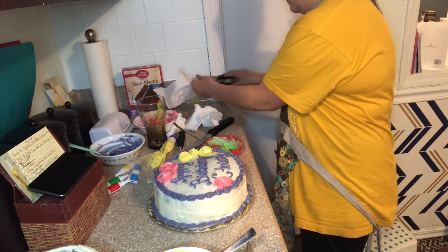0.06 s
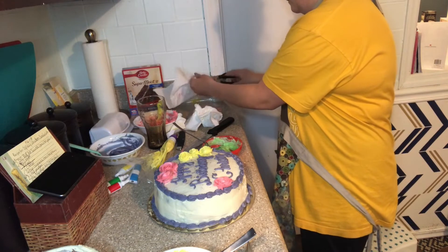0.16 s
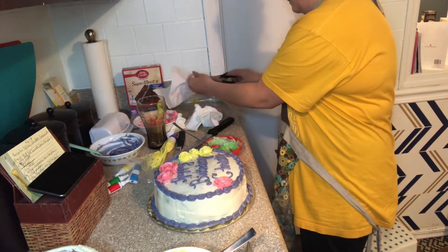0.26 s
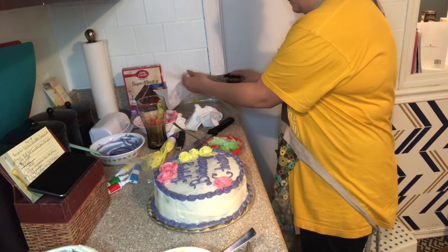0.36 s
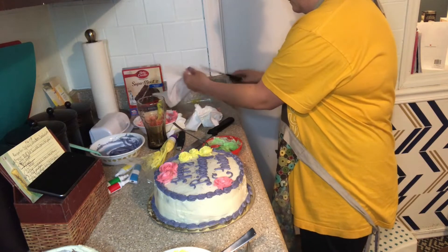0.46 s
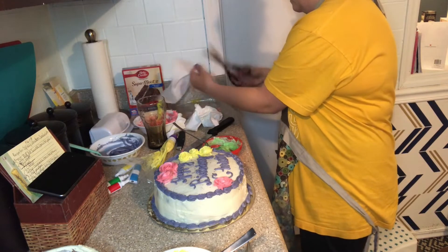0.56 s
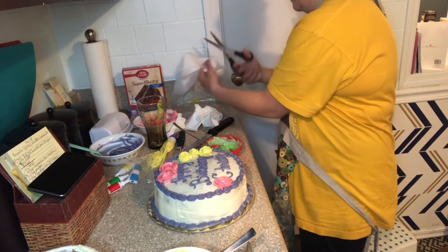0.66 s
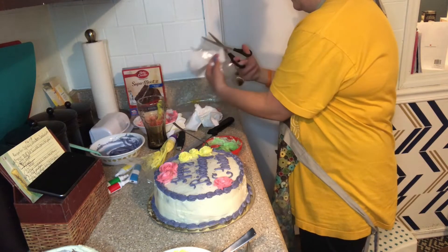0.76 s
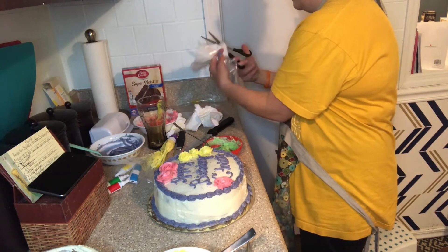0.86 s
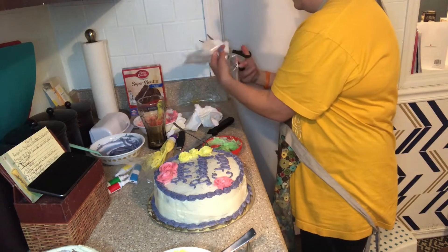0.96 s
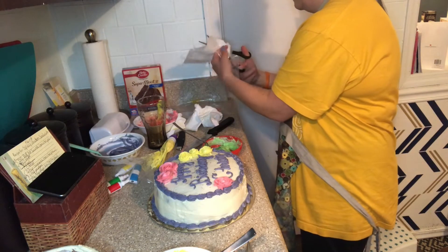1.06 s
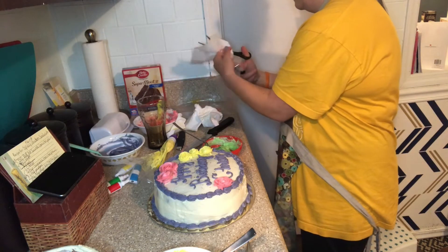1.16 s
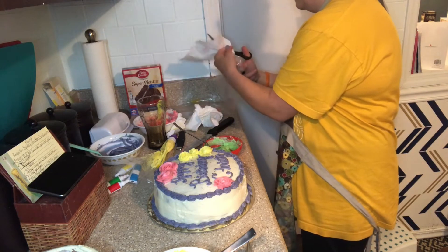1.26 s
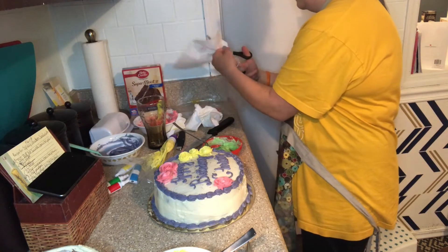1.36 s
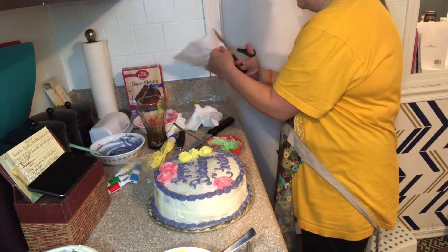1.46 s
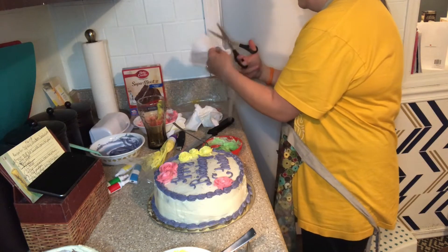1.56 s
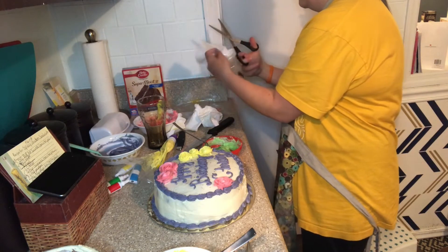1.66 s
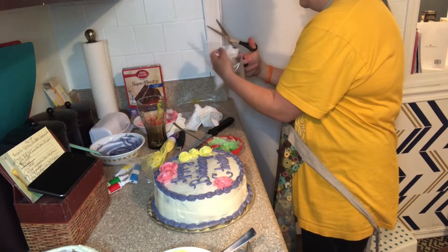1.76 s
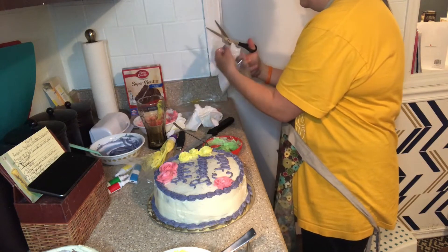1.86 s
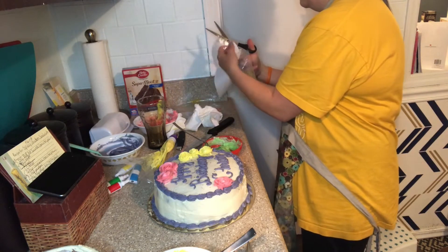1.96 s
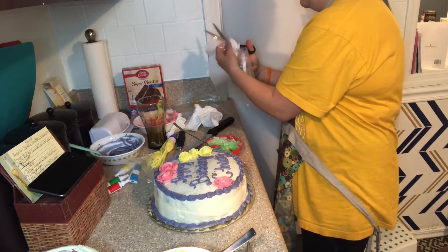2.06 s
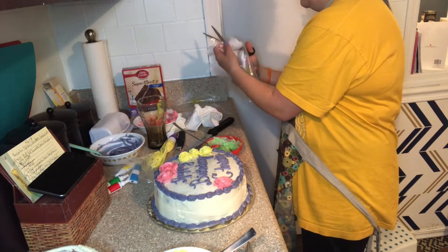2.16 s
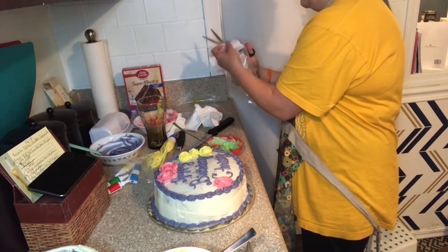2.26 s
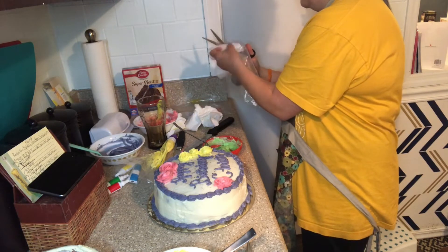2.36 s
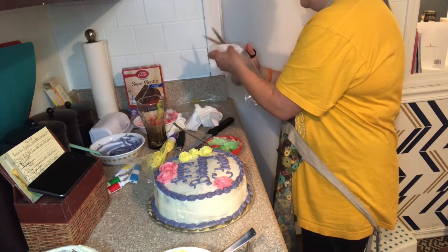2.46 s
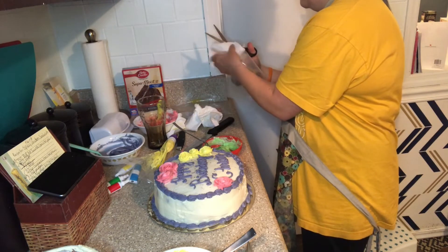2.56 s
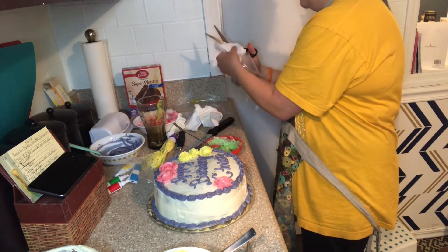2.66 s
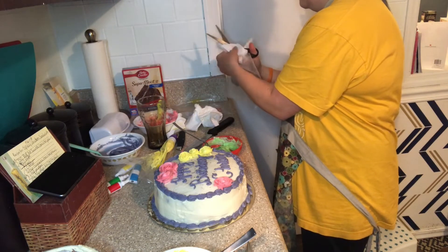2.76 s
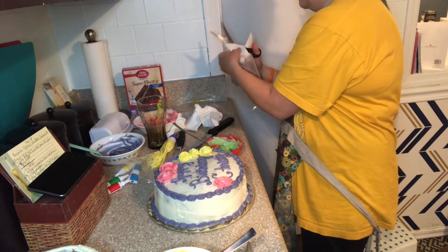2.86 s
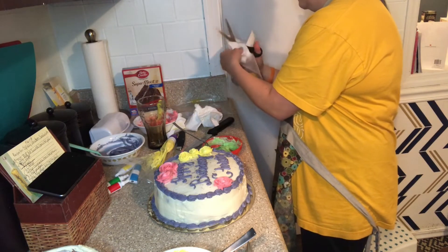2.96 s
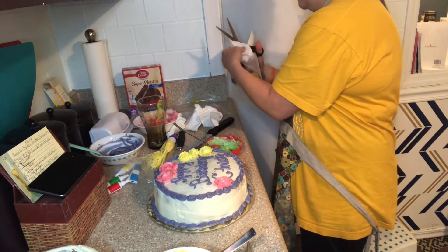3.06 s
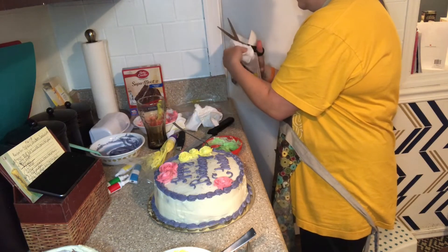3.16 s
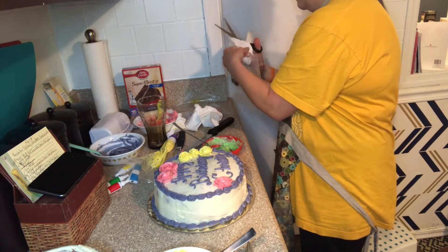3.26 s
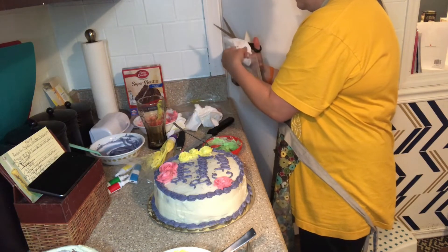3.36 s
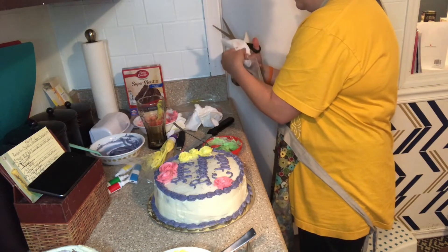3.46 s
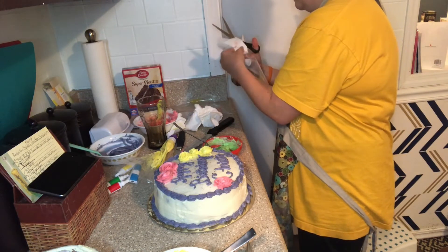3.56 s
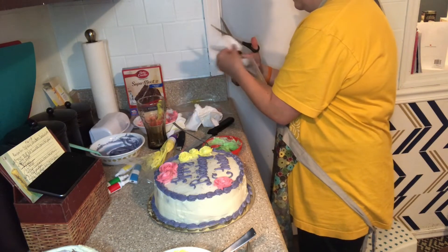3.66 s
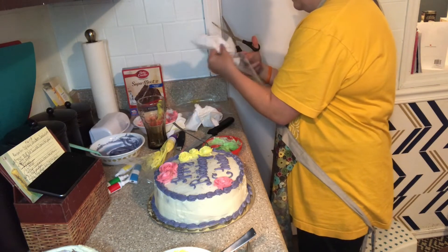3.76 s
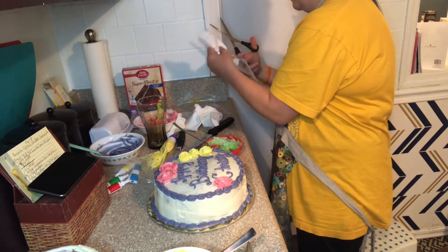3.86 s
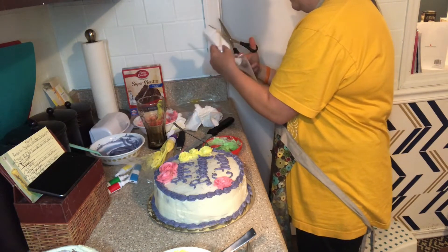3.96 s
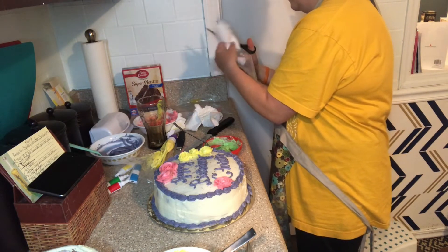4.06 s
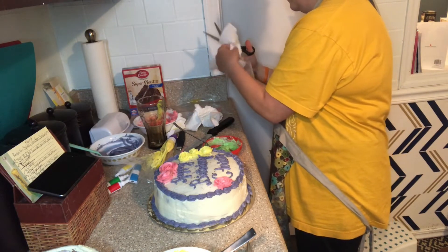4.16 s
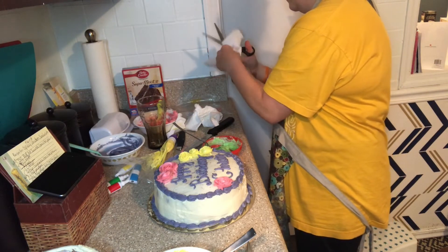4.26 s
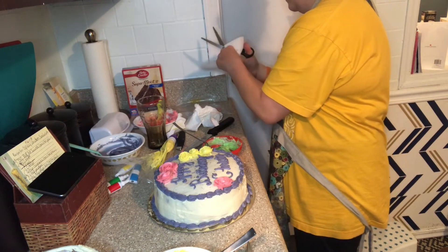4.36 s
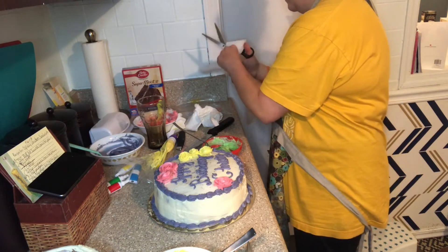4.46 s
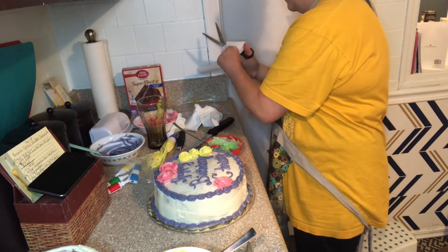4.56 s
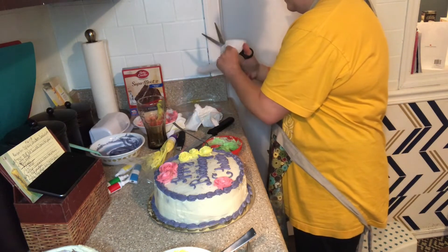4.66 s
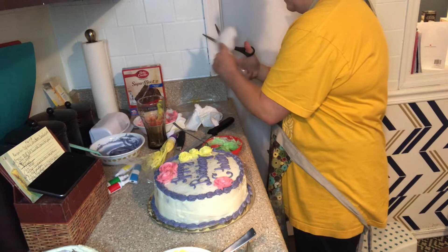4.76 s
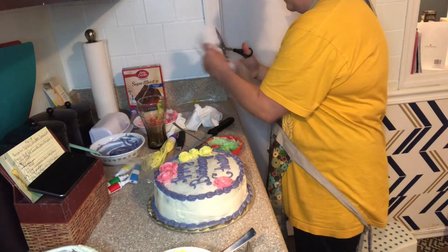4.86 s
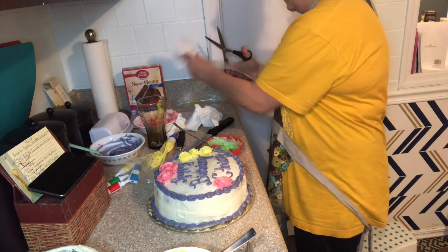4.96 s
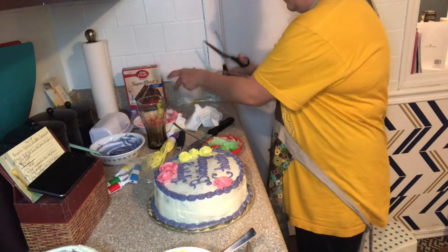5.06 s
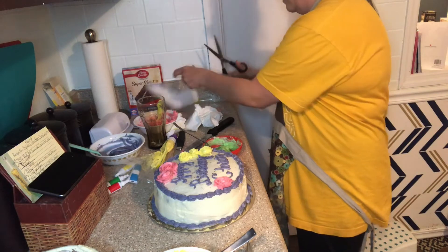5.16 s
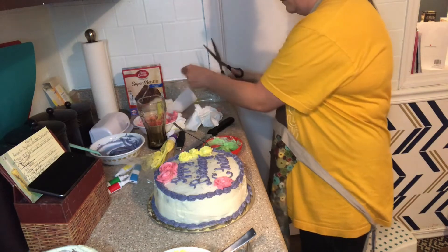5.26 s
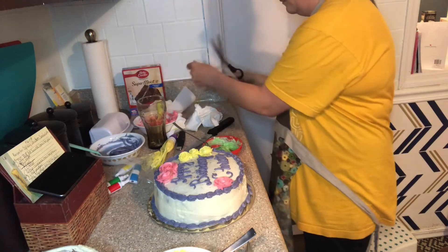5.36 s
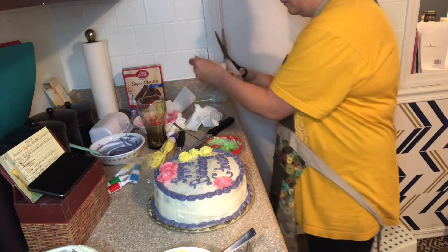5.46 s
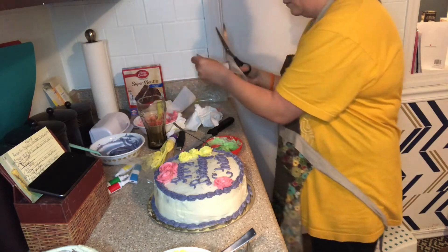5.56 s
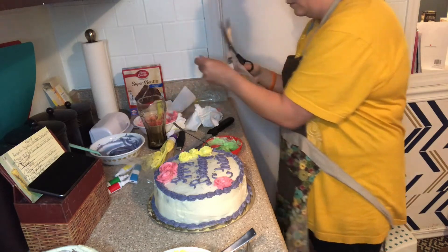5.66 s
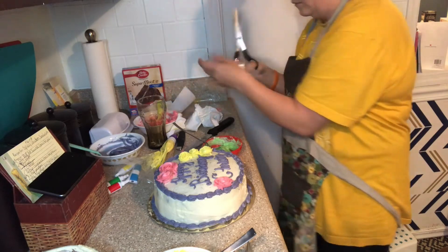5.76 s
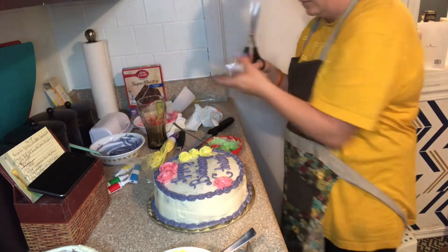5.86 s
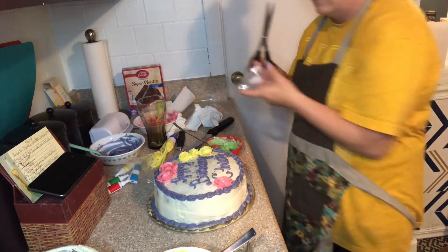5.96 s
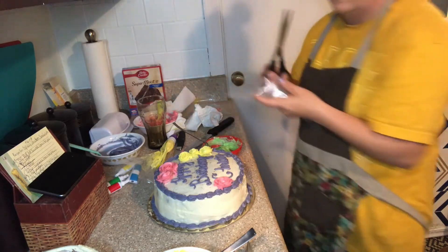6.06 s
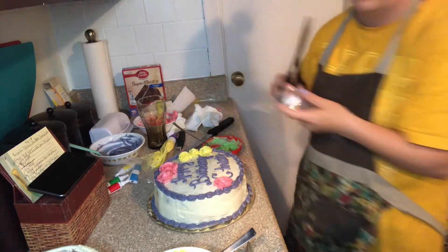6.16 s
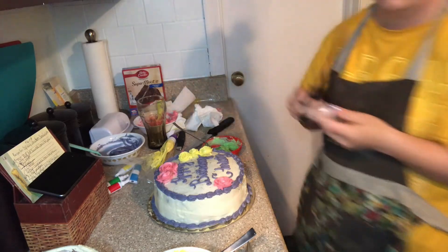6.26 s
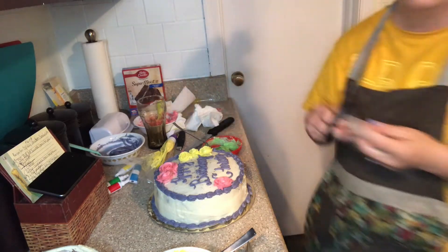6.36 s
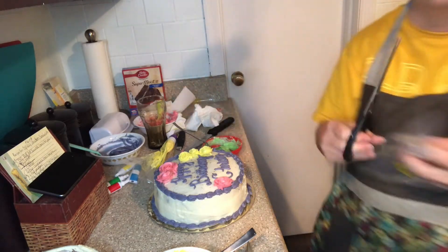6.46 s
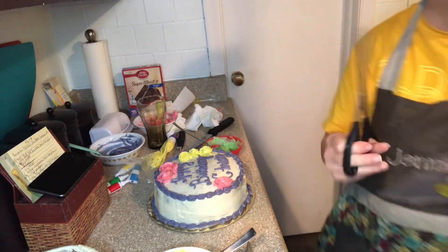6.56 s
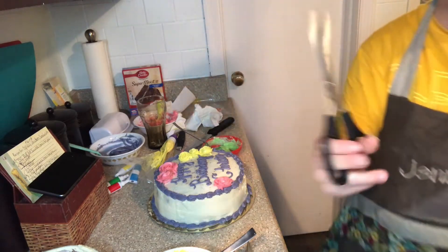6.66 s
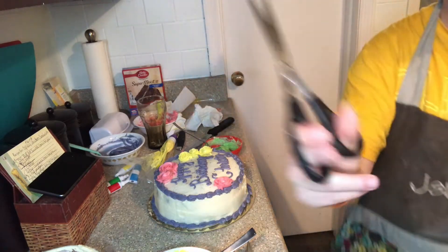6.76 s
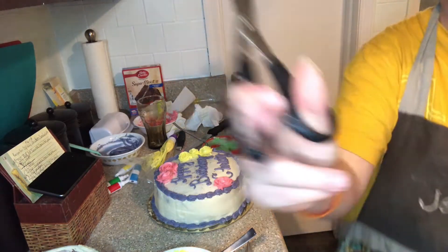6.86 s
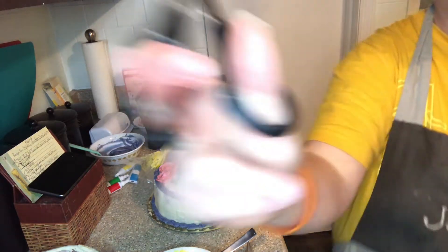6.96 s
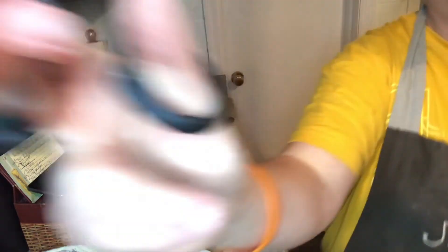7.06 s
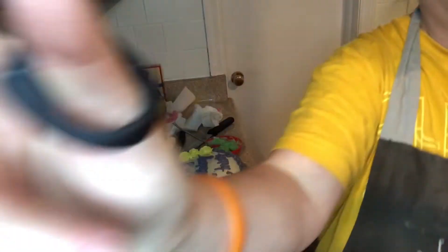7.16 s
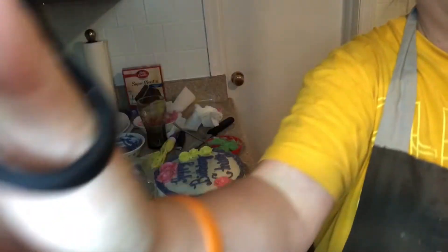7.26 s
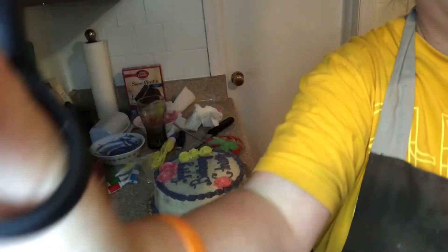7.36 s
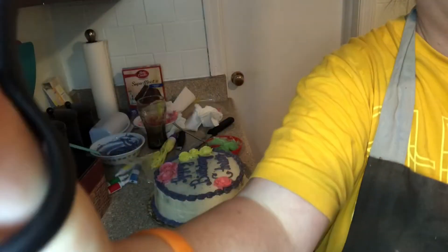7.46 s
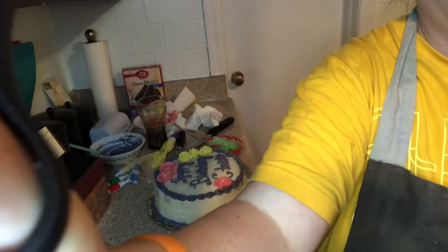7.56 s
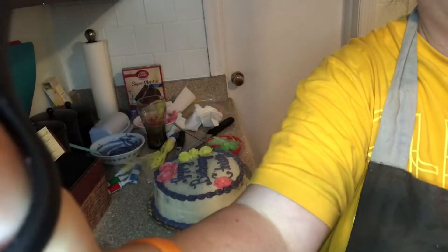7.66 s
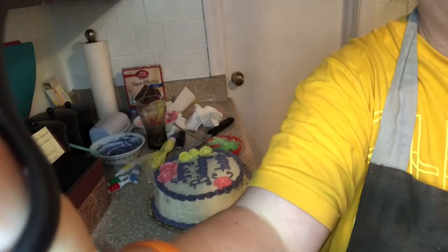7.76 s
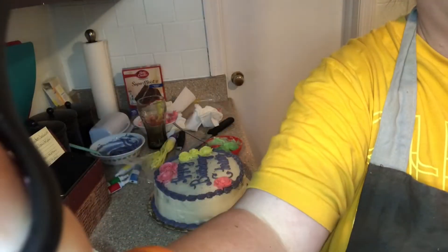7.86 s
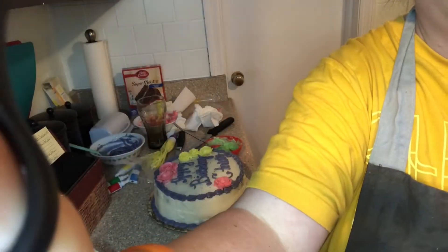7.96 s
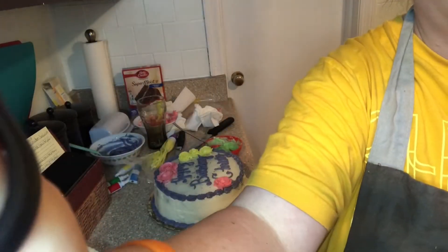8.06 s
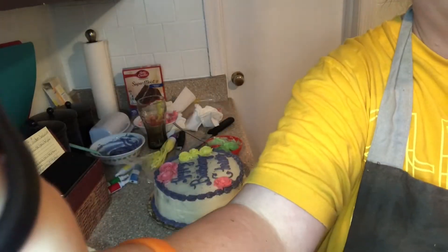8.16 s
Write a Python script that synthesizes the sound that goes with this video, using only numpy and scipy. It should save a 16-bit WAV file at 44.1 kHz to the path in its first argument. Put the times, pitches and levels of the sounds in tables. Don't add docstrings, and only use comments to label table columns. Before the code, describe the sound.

A thin plastic bag crinkles and snaps in a hard kitchen over faint hum, then blunt finger taps knock the microphone at the end.

```python
import sys
import numpy as np
from scipy import signal
from scipy.fft import rfft, irfft, next_fast_len
from scipy.io import wavfile

SR = 44100
rng = np.random.default_rng(int(sys.argv[2]) if len(sys.argv) > 2 else 0)


def generate_wav(signal):
    frames = np.transpose(np.atleast_2d(signal))
    scaled = np.clip(frames, -1, 1) * 32767
    pcm = np.round(scaled).astype(np.int16)
    wavfile.write(sys.argv[1], SR, pcm)


def invert_db(x):
    u = np.asarray(x, float) / 20
    return 10 ** u


N = 362061


def rms_one(x):
    return x / np.sqrt(np.mean(x ** 2) + 1e-20)


def in_time(rows):
    s, *columns = np.transpose(rows)
    return [np.interp(np.arange(N) / SR, s, c) for c in columns]


def at_hz(points, hz):
    table_hz, values = np.transpose(points)
    return np.interp(np.log(hz), np.log(table_hz), values)


def drift(rate_hz):
    r = np.exp(-80 * np.pi * rate_hz / SR)
    white = rng.standard_normal(N // 40 + 2002)
    slow = signal.lfilter([1], [1, -2 * r, r * r], white)[2000:]
    return np.interp(np.arange(N) / 40, np.arange(len(slow)), rms_one(slow))


def colour(x, spectrum):
    size = next_fast_len(N)
    hz = np.arange(size // 2 + 1) * SR / size + 1
    low_fall = np.minimum(hz / spectrum[0][0], 1) ** 3
    gain = invert_db(at_hz(spectrum, hz)) * low_fall
    return rms_one(irfft(rfft(x, size) * gain, size)[:N])


def resonate(x, hz, width_hz):
    r = np.exp(-np.pi * width_hz / SR)
    poles = [1, -2 * r * np.cos(2 * np.pi * hz / SR), r * r]
    return signal.lfilter([(1 - r * r) / 2, 0, (r * r - 1) / 2], poles, x)


def band_pass(x, order, low_hz, high_hz):
    return signal.sosfilt(signal.butter(order, [low_hz, high_hz], "band", fs=SR, output="sos"), x)


def swells(s, db, rise_s, fade_s):
    late_s = np.arange(0, N + 64, 64)[:, None] / SR - s
    below = np.maximum(-late_s / np.abs(rise_s), late_s / np.abs(fade_s))
    power = np.sum(invert_db(2 * (db - 20 * below)), axis=1)
    return np.interp(np.arange(N) / 64, np.arange(len(power)), 10 * np.log10(power + 1e-20))


# start_s, level_db
BACKGROUND = [(0.0, -68), (0.4, -68), (1.5, -67), (2.0, -67), (2.06, -60), (3.3, -61), (4.4, -61),
              (5.5, -62), (6.25, -61), (6.5, -60), (6.75, -62.5), (7.33, -57.5), (7.5, -61), (7.63, -67),
              (7.85, -66.5), (8.08, -66.5), (8.15, -71)]
# pitch_hz, level_db (per Hz)
RUMBLE = [(40, -19), (55, -2), (80, -12.5), (100, -2), (160, -10), (260, -11.5), (500, -27.5), (900, -44.5)]
HISS = [(180, -32), (300, -5.5), (372, -41.5), (418, -6), (1400, -23.5), (6670, -27), (8410, -30),
        (15800, -37.5)]
# peak_s, level_db, half_length_s
LUMPS = [
    (1.7, -74.5, .1),
    (2.5, -69, .3),
    (3.5, -65.5, 0.2807),
    (5.3, -52, 0.441),
    (6.37, -43, 0.073),
    (6.556, -58, 0.435),
    (7.305, -51, 0.33),
    (7.851, -54, 0.1277),
    (8.175, -44.5, 0.0544),
]


def background():
    hum_hz, lump_floor_db, hiss_db = 121.6, -76.5, -73
    level_db, = in_time(BACKGROUND)
    rumble = invert_db(1.6 * drift(6)) * colour(rng.standard_normal(N), RUMBLE)
    steady = np.sqrt(2) * np.sin(2 * np.pi * hum_hz * np.arange(N) / SR)
    wobble = rms_one(resonate(rng.standard_normal(N), hum_hz, 31))
    hum = invert_db(0.5) * (0.65 * steady + 0.5 * wobble)
    s, db, half_s = np.transpose(LUMPS)
    lumps = np.hypot(invert_db(swells(s, db, half_s, half_s)), invert_db(lump_floor_db))
    deep = invert_db(-10.5) * lumps * rms_one(resonate(rng.standard_normal(N), 74, 32))
    hiss = invert_db(hiss_db) * colour(rng.standard_normal(N), HISS)
    return invert_db(level_db) * (rumble + hum) + deep + hiss


# start_s, level_db, brightness_db
HANDLING = [(0.0, -72.5, 0), (0.2, -66, 6), (0.55, -67.5, -12), (0.76, -84, 0), (1.75, -64, -3.5),
            (2.03, -59, -1), (2.1, -59, -6), (2.6, -59, -0.5), (3.0, -72.5, 2), (3.35, -59.5, -16),
            (3.5, -70.5, -5), (3.8, -63.5, -1.5), (4.6, -57, -4.5), (5.1, -64, 2), (5.4, -78, 2.5),
            (6.3, -67, -1), (6.7, -78, -2), (7.35, -75, -18)]
# peak_s, level_db, swell_s, fade_s (both over 20 dB), brightness_db
UNFOLD = [
    (0.32, -60.5, 0.14, 0.03947, 14),
    (0.85, -54.5, 0.08518, 0.02, 7),
    (1.023, -53, 0.099, 0.14, -2.5),
    (1.17, -52, .02, 0.056, -1),
    (1.23, -55, 0.044, 0.03154, -14),
    (1.4, -52, 0.12, 0.1657, 1),
    (1.61, -59, 0.13, 0.126, 5),
    (1.89, -69, 0.01844, 0.1329, 16),
]
WORK = [(2.08, -56.5, 0.0644, 0.2116, -0.5), (2.19, -53.5, 0.098, 0.1058, 5.5),
        (2.33, -60.5, 0.03113, 0.52, 7), (2.46, -54, 0.042, 0.13, 11), (2.67, -56.5, 0.1669, 0.038, -2),
        (2.76, -67, .05, 0.02854, 16), (2.89, -56.5, 0.2029, 0.0522, 1), (2.99, -54, 0.0328, 0.032, -4),
        (3.1, -54, 0.1207, 0.13015, -4), (3.27, -59, 0.13, 0.112, 9), (3.63, -57.5, 0.12, 0.17, 6),
        (3.7, -57.5, 0.14, 0.0607, 4), (3.9, -55.5, 0.13, 0.03634, -23), (3.97, -61, .02, 0.22, -10),
        (4.199, -52.5, 0.01908, 0.24, 3.5), (4.31, -60.5, 0.1515, 0.024, 7),
        (4.37, -61, 0.02546, 0.02886, 13), (4.53, -55.5, 0.17, 0.12, 0.5), (4.63, -73, 0.0799, 0.28, -3),
        (4.783, -51, 0.027, 0.099, 12), (4.74, -57.5, .08, 0.23, 2), (4.89, -58, 0.028, 0.058, 8.5),
        (5.01, -53, 0.02425, 0.086, -4)]
TURN = [(5.6, -65.5, 0.2115, 0.1244, -10.5), (5.749, -60.5, 0.023, 0.13, 10), (5.898, -53, 0.051, 0.07, 3),
        (6.05, -52, 0.05335, 0.068, 3), (6.217, -49, 0.012, 0.022, 15), (6.265, -55.5, 0.02256, 0.18, -1),
        (6.165, -63.5, 0.0177, 0.029, 12), (6.35, -55, 0.19, 0.14, 0), (6.427, -47, 0.027, 0.047, 3),
        (6.85, -62, 0.07307, 0.03925, 4), (6.93, -58.5, 0.1, 0.1482, 6), (7.17, -61, 0.1788, 0.043, -6),
        (7.26, -59.5, 0.14, 0.063, 16)]
# pitch_hz, level_db (per Hz)
BAG_BODY = [(180, -3), (300, -1), (500, 6.5), (800, 2.5), (1200, -1.5), (2000, -49)]
CREASES = [(600, -18), (1100, -6.5), (1600, 1), (2200, -4.5), (3000, -5), (4500, -9.5), (7000, -31.5)]
FINE = [(2500, -14.5), (4200, -3), (6000, -1.5), (8000, -1), (9500, -14), (13000, -14.5)]
AIRY = [(6500, -16), (9000, 7), (11000, 8.5), (13500, -5), (16000, -1)]
# level_db (above a squeeze), brightness_share, stretch (of swell and fade, ratio)
PARTS = [
    (-3, -0.081, 1.31),
    (0, 0.12, 1.04),
    (-5, 0.9, 0.73),
    (-15.5, 0.66, 1.1313),
]


def crumpling(per_s, spread_db, clump_db):
    hands_still_s, stop_s = 7.4, 0.13
    born = rng.random(N) < per_s / SR
    size_db = spread_db * np.minimum(rng.exponential(1, N), 3.5)
    pops = born * invert_db(size_db) * rng.choice([-1, 1], N)
    stop_db = 20 * np.maximum(np.arange(N) / SR - hands_still_s, 0) / stop_s
    pops = pops * invert_db(clump_db * drift(52.76) - stop_db)
    s, db, swell_s, fade_s, bright_db = np.transpose(UNFOLD + WORK + TURN)
    steady_db, steady_bright_db = in_time(HANDLING)
    out = 0
    for (part_db, share, stretch), shape in zip(PARTS, (BAG_BODY, CREASES, FINE, AIRY)):
        squeezes_db = swells(s, db + share * bright_db, stretch * swell_s, stretch * fade_s)
        gain = np.hypot(invert_db(squeezes_db), invert_db(steady_db + share * steady_bright_db))
        out = out + invert_db(part_db) * gain * colour(pops, shape)
    return out


def panels(film, ring_db, sharpness, grip_s, count):
    size, out = round(grip_s * SR), np.zeros(N)
    starts = np.arange(0, N - 2 * size, size)
    for at, draws in zip(starts, rng.random((len(starts), count))):
        piece = film[at:at + 2 * size] * np.hanning(2 * size)
        for hz in 280 * (7000 / 280) ** draws:
            out[at:at + 2 * size] += resonate(piece, hz, hz / sharpness)
    return invert_db(ring_db) * out


# pitch_hz, t60_s
KITCHEN = [(300, 0.06145), (1000, 0.3), (2500, 0.47), (6000, 0.36), (14000, 0.2233)]


def kitchen(x, first_wall_s, patchy_db):
    edges = 250 * 2 ** np.arange(0, 6.4, 1 / 3)
    echo, white = 0, rng.standard_normal((2, N))
    for k, (low, high) in enumerate(zip(edges, edges[1:])):
        keep = invert_db(-120 / SR / at_hz(KITCHEN, np.sqrt(low * high)))
        energy = signal.lfilter([1 - keep], [1, -keep], band_pass(x, 2, low, high) ** 2)
        patches = invert_db(patchy_db * drift(4.9))
        echo = echo + np.sqrt(energy) * patches * rms_one(band_pass(white[k % 2], 2, low, high))
    return np.roll(echo, round(first_wall_s * SR))


def noise_filter(x):
    opens_s, focus_hz, focus_width_hz, focus_db = 2.05, 2150, 1000, 0.5
    closed = np.clip((opens_s - np.arange(N) / SR) / 0.01, 0, 1)
    focus = invert_db(focus_db) * resonate(x, focus_hz, focus_width_hz)
    dull = 0.5 * band_pass(x, 1, 450, 9000)
    return x + closed * (focus + dull - x)


# start_s, level_db, pitch_hz, fade_s (over 20 dB), sharpness (pitch over width, ratio)
FOLDS = [(0.06, -65, 2269, .15, 1.756), (0.19, -56.5, 2470, .3, 1.5), (0.25, -54.5, 1960, .2, 2.7),
         (0.31, -53, 2174, -0.2, 0.942), (0.461, -50, 2150, -0.25, 3.1), (0.845, -61, 440, -0.15, 3.06),
         (1.015, -53, 2270, -0.2, 2.2), (1.175, -56, 500, -0.5, 3.1), (1.184, -51, 1900, -0.5, 3.8),
         (1.39, -59.5, 405.8, -0.3, 2.5), (1.6, -48, 1210, 0.0193, 2), (1.8, -63, 420, 0.6793, 2.168),
         (1.89, -60.5, 454, .1, 2.7), (2.182, -50.5, 2850, 1.5, 5.9), (2.243, -51, 792, -0.1, 1.5),
         (2.487, -62, 900, -1, 1.022), (2.56, -54.5, 5030, .15, 2.854), (2.648, -53.5, 2150, 0, 2.3),
         (2.98, -57.5, 790.8, -0.2, 2.5), (4.1, -54, 230, -0.1, 3.005), (4.438, -54, 760, -0.2, 3.1),
         (4.46, -50, 521.7, -0.14, 3.6), (4.645, -58, 3427, -0.2, 1.855), (4.79, -51, 763, -0.3, 2.6),
         (4.81, -51.5, 2050, .08, 3.5), (5.02, -67, 1290, 0.2025, 2.26), (5.15, -64, 748.9, .16, 2.586),
         (5.53, -66.5, 774.7, 0.8, 3.34), (5.77, -63.5, 493.1, .16, 3.5), (5.76, -61, 3947, .2, 3),
         (5.79, -56.5, 2374, -0.4, 3.1), (5.88, -62, 1789, -0.5, 4.76), (6.045, -53, 402, 0, 4),
         (6.06, -73, 6296, 7.6881, 5.5), (6.26, -47, 1200, .025, 2.6), (6.321, -51, 902.3, 0, 1.1),
         (6.44, -52.5, 2600, -6, 2.8), (6.434, -52, 1140, 0.06, 1.8), (7.23, -53.5, 2811, 0.135, 2.2),
         (7.5, -67, 187, .16, 2.5)]


def folds():
    swell_share, shortest_s, longest_s = 0.15, 0.015, 0.3
    lead = SR // 8
    out, t = np.zeros(N + SR), np.arange(-lead, SR // 3) / SR
    grains = rng.standard_normal((len(FOLDS), len(t))) ** 3
    for (s, db, hz, fade_s, sharpness), noise in zip(FOLDS, grains):
        width_hz = hz / sharpness
        tone = rms_one(resonate(resonate(noise, hz, width_hz), hz, width_hz))
        drop_db = 20 * np.maximum(-t / swell_share, t) / np.clip(fade_s, shortest_s, longest_s)
        at = round(s * SR)
        out[at:at + len(t)] += tone * invert_db(db - drop_db)
    return out[lead:lead + N]


def snap_colour(x, hz, body_db, edge_db, octaves):
    usual_edge_db = -16.5
    top_db = -5 + edge_db + 0.32 * (edge_db - usual_edge_db)
    bands = [(hz / 2 ** octaves, hz * 2 ** octaves, 0),
             (1063, 4570, 2.7),
             (400, 1100, body_db + 6.5),
             (3800, 9000, edge_db + 6.5),
             (8000, 16000, top_db)]
    return sum(invert_db(db) / np.sqrt(high - low) * band_pass(x, 2, low, high) for low, high, db in bands)


# start_s, peak_db, pitch_hz, brightness_db, room_share_db
SNAPS = [(0.4468, -30.5, 1850, -7, -10.5), (0.84, -39, 2830, 11, -8), (0.9875, -30, 1920, -3, -18),
         (1.1275, -40, 1510, -12.5, -10), (1.1682, -29.5, 2150, 5.5, -14.5),
         (1.2572, -28.5, 3954, 14.5, -14), (1.6016, -35, 2230, 1, -20), (1.6528, -36.5, 1740, -7.5, -17),
         (1.8824, -35.5, 2900, -6, -22), (1.9125, -36, 1350, -7, -9), (2.168, -31, 2802, 12, -3.5),
         (2.2074, -35.5, 2000, 2, -15), (2.4558, -34.5, 1930, 21, -14), (2.6425, -41.5, 2000, -13.5, -3),
         (3.9617, -30.5, 3705, 8, -9.5), (4.1956, -33, 1620, -4, -19), (4.5263, -30, 1292, 21.5, -7),
         (4.779, -33, 2584, 16.5, -7), (5.0096, -35, 1298, 2, -6), (5.743, -35.5, 3647, -2, -5.5),
         (6.047, -34.5, 2795, 3, -5), (6.21, -33, 1770, -8, -9), (6.3225, -36, 1554, -15.5, -12),
         (6.4245, -28.5, 2286, -1, -7.5)]
# start_s, peak_db, pitch_hz, brightness_db
SMALL_SNAPS = [(0.65, -48.5, 3880, 16), (0.2891, -44, 2040, -0.5), (0.6918, -53, 1413, -2),
               (0.81, -48, 3350, -12), (0.9717, -40, 2600, -2), (1.236, -39, 3074, 0),
               (1.383, -46, 1547, -7), (1.522, -46, 1333, -5), (1.614, -43.5, 2200, -9),
               (1.8594, -50, 2316, -15), (2.1056, -42, 2360, 1), (2.3592, -41, 4444, 0),
               (2.554, -43.5, 5533, -6), (2.7452, -52, 1910, -3), (2.872, -45, 1350, 8),
               (2.9719, -37, 2680, -8), (3.0822, -41, 1330, -5), (3.248, -45.5, 1793, -2),
               (3.376, -49.5, 3600, 4), (4.209, -45.5, 4500, 3), (4.532, -40, 1300, -6),
               (4.9996, -47, 5500, 5), (3.881, -39, 3057, -11), (4.3628, -42, 3700, 8),
               (4.4338, -38.5, 799.2, 5), (4.6399, -38.5, 1840, -7), (4.892, -43, 2040, -0.5),
               (5.529, -50, 745, -20.5), (5.573, -54, 1490, 0), (5.875, -46, 1920, -4),
               (5.883, -48, 2504, 0), (5.988, -44.5, 1680, -8), (6.025, -48, 3500, -5),
               (6.0328, -38.5, 1740, -12), (6.2873, -41.5, 1920, -5), (6.895, -50, 5000, 4.5),
               (7.23, -45, 3000, 2), (6.2611, -40.5, 1207, -9), (7.215, -51, 2520, 4.5),
               (7.34, -47.5, 894, -17)]
# delay_s, level_db
EARLY = [
    (.0026, -3.5),
    (.0045, -9.5),
    (.0066, -8),
]


def snaps(crack_s, octaves):
    small_room_db = -9
    dry, wet, t = np.zeros(N + SR), np.zeros(N + SR), np.arange(SR // 30) / SR
    echoes = np.zeros(SR // 100)
    for delay_s, echo_db in [(0.0015, 0), *EARLY]:
        echoes[round(delay_s * SR)] = invert_db(echo_db)
    rows = [*SNAPS] + [(*row, small_room_db) for row in SMALL_SNAPS]
    for (s, db, hz, bright_db, room_db), noise in zip(rows, rng.standard_normal((len(rows), len(t)))):
        body_db = -15 - bright_db - 8 * np.log2(hz / 1500)
        edge_db = -16.5 + bright_db
        crackle = np.convolve(noise * np.exp(-t / crack_s), echoes)[:len(t)]
        pop = snap_colour(crackle, hz, body_db, edge_db, octaves)
        pop = invert_db(db) * pop / np.abs(pop).max()
        click = snap_colour(1. * (t == 0), hz, body_db, edge_db, octaves)
        at = round(s * SR)
        dry[at:at + len(t)] += pop
        wet[at:at + len(t)] += rms_one(click) * np.std(pop) * invert_db(room_db + 7.5)
    return dry[:N], wet[:N]


def brush():
    peak_s, level_db, rise_s, fade_s, ends_s = 7.48, -62.5, 0.02337, 0.079, 7.53
    hiss = colour(rng.standard_normal(N), [(5000, -24.5), (9000, -4), (13000, 2.5), (16000, -1.0)])
    return invert_db(swells(peak_s, level_db, rise_s, fade_s)) * (np.arange(N) < ends_s * SR) * hiss


# start_s, peak_db, first_pitch_hz, t60_s, sag_s
TAPS = [(7.8229, -23.5, 640, 0.013, 0.0086), (7.826, -36, 257, 0.0444, 0.0097),
        (7.874, -54.5, 756.3, .04, 0.03344), (7.8835, -46.5, 758.2, 0.01579, 0.02452),
        (7.8886, -35.5, 700, 0.017396, .008), (7.892, -43, 300, 0.026, 0.013),
        (8.1653, -15, 655, 0.011, 0.013), (8.169, -33, 250, 0.036, .01), (8.176, -40.5, 500, .05, .02),
        (8.1825, -27, 624.4, .03, .03), (8.189, -30, 1215, 0.014, 0.01137), (8.188, -11, 770, 0.033, 0.013),
        (8.1928, -24, 414, .04, 0.0093), (8.1979, -11, 1016, 0.019, .009), (8.203, -20, 617, 0.01935, 0.04)]
# start_s, peak_db, pitch_hz
TICKS = [
    (7.886, -59.5, 1946),
    (8.1642, -54, 2800),
    (8.1881, -40, 2600),
    (8.1915, -60, 4466),
    (8.198, -38.5, 4400),
]


def housing(touch_s):
    shell_skew = 0.15
    rattle_db, rattle_t60_s, tick_t60_s = -12.5, 0.06, 0.0072
    out, t = np.zeros(N + SR), np.arange(SR // 10) / SR
    for s, db, hz, t60_s, sag_s in TAPS:
        at = round(s * SR)
        phase = 2 * np.pi * hz * sag_s * (1 - np.exp(-t / sag_s))
        touch = (1 - np.exp(-t / touch_s)) ** 3
        shell = np.sin(phase) + shell_skew * np.cos(2 * phase)
        out[at:at + len(t)] += touch * invert_db(db + 3.5 - 60 * t / t60_s) * shell
    for (s, db, hz), noise in zip(TICKS, rng.standard_normal((len(TICKS), len(t)))):
        at = round(s * SR)
        tick = invert_db(db - 60 * t / tick_t60_s) * np.sin(2 * np.pi * hz * t)
        rattle = invert_db(db + rattle_db - 60 * t / rattle_t60_s) * resonate(noise, 2500, 3000)
        out[at:at + len(t)] += tick + rattle
    return out[:N]


def scene():
    creases = crumpling(per_s=3500, spread_db=2.1, clump_db=2.5)
    direct, to_walls = snaps(crack_s=0.0011, octaves=0.35)
    room = kitchen(invert_db(-7.5) * creases + to_walls, first_wall_s=0.003, patchy_db=2.0)
    film = invert_db(-5) * creases + room
    ringing = panels(film, ring_db=1.0, sharpness=35.6, grip_s=0.04, count=8)
    bag = noise_filter(film + ringing + direct)
    return (background() + bag + folds() + brush() + housing(touch_s=0.00094))[None]


def band_limit(x):
    return signal.sosfilt(signal.butter(12, 16480, fs=SR, output="sos"), x)


def record(dry):
    bass_cut = signal.butter(4, 42, "high", fs=SR, output="sos")
    top_cut = signal.cheby2(14, 60, 16280, fs=SR, output="sos")
    mix = signal.sosfilt(top_cut, signal.sosfilt(bass_cut, dry))
    return band_limit(mix)


dry = scene()
out = record(dry)
generate_wav(out)
```